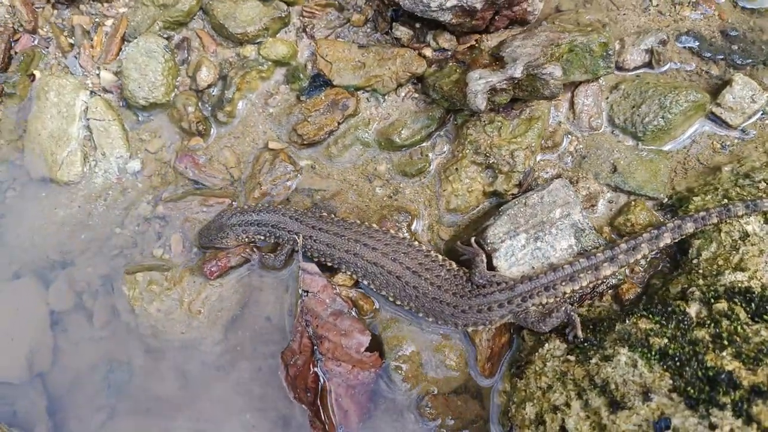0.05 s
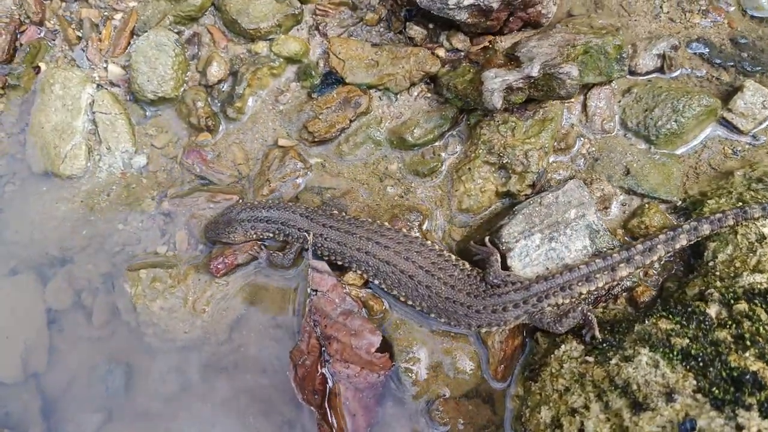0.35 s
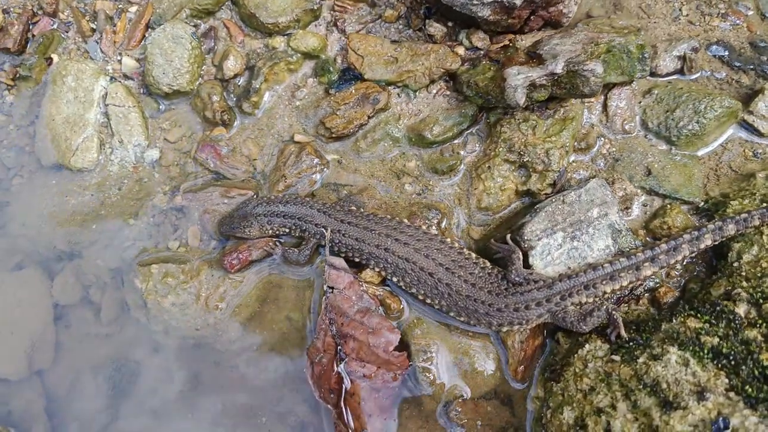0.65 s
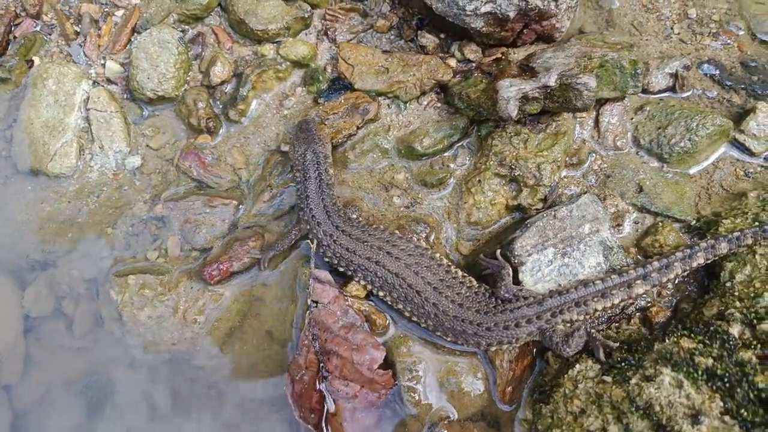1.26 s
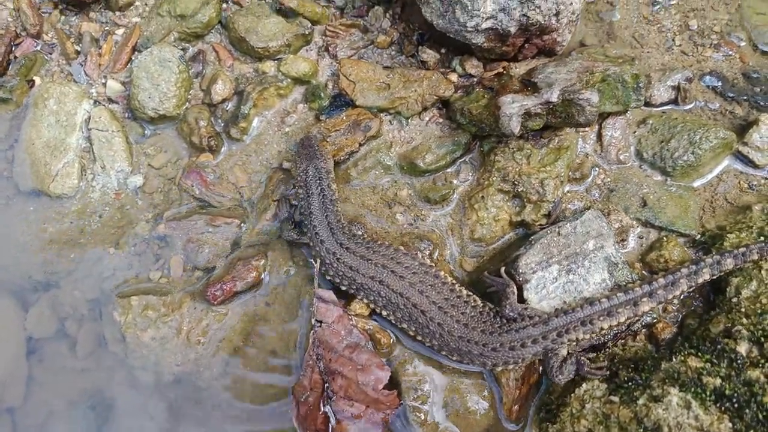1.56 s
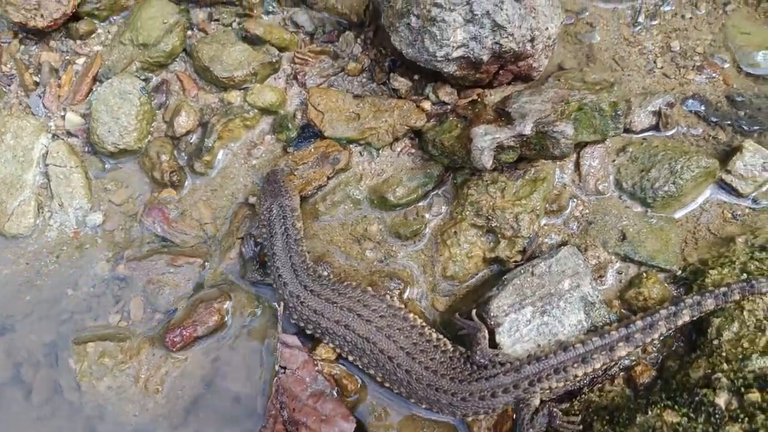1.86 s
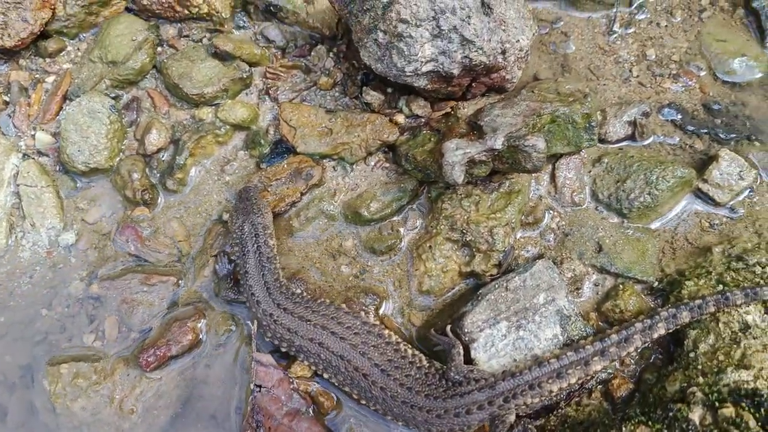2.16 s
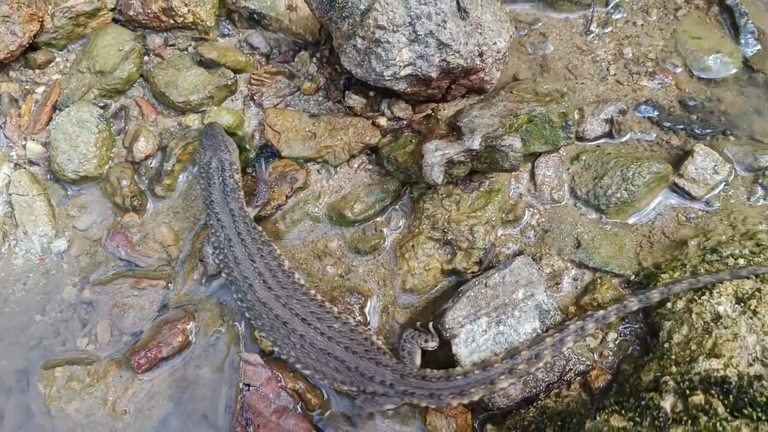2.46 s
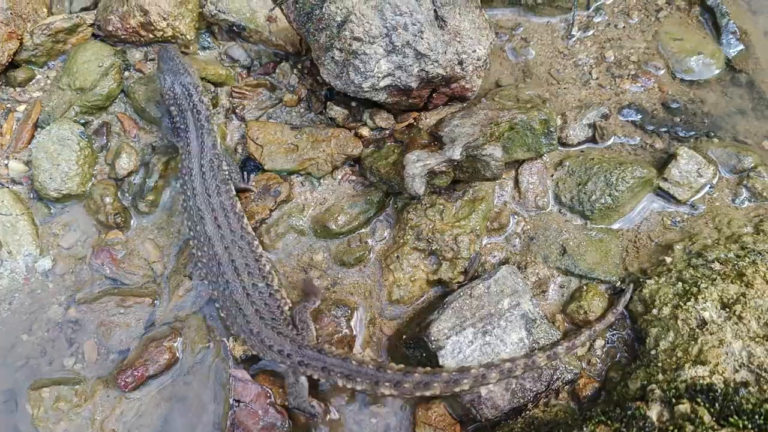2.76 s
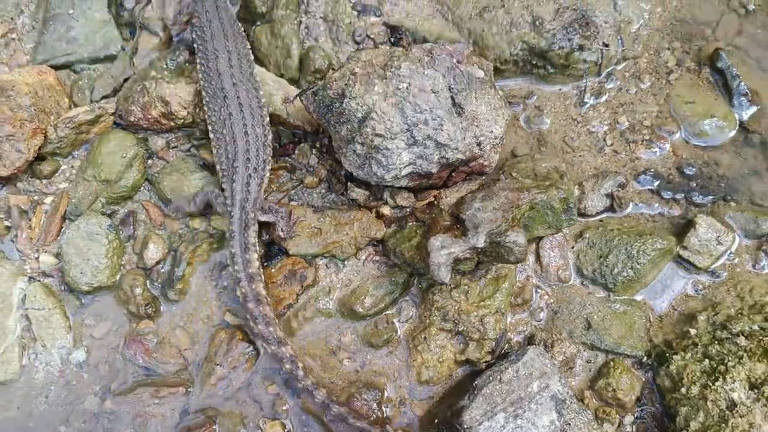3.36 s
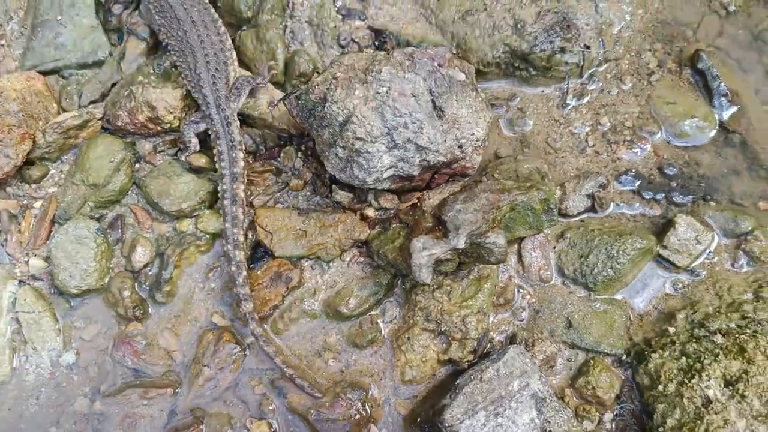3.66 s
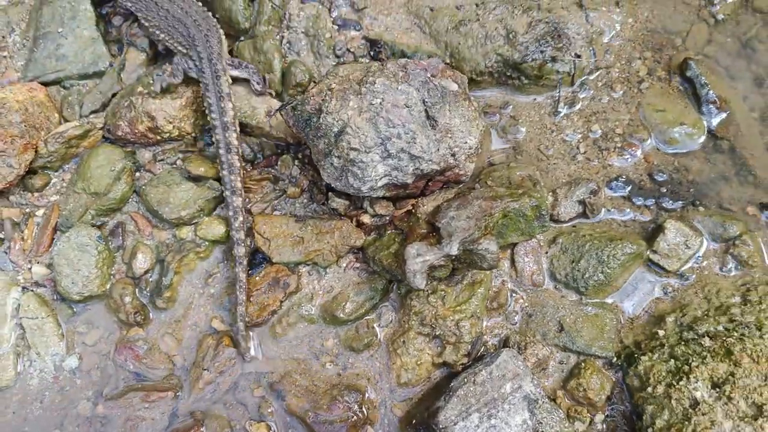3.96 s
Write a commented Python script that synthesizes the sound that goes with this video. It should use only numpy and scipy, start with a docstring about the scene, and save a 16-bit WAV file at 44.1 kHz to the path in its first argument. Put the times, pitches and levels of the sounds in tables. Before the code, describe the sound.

A cicada rattles loudly and continuously while a small bird chirps in the jungle.

```python
"""Jungle stream bank

A near cicada rattles 23 times a second, each beat a few falling chirps from its buckling tymbals
(drum skins). Behind it a cricket throbs and far insects blur into whistles. A small bird sings
falling and rising sweeps in turn, and soft calls come from deep in the forest. The stream murmurs
while a lizard steps faintly on the wet stones and drags its tail over gravel."""
import sys
import numpy as np
from scipy import signal
from scipy.fft import rfft, irfft
from scipy.io import wavfile
from scipy.ndimage import uniform_filter1d

SR = 44100
rng = np.random.default_rng(int(sys.argv[2]) if len(sys.argv) > 2 else 0)


def master_out(mix):
    """Clip the mix to full scale and print it as 16-bit PCM to the path in sys.argv[1]."""
    frames = np.transpose(np.atleast_2d(mix))
    ceiling = np.clip(frames, -1, 1)
    pcm = np.round(ceiling * 32767).astype(np.int16)
    wavfile.write(sys.argv[1], SR, pcm)


N = 176400

# When each chirp starts within a beat (time [s])
CHIRP_STARTS = [.0026, .0120, .0150, .0222, .0250]
# Those chirps (length [s], first pitch [Hz], last pitch [Hz], level [dB], octave level [dB],
# share of the swell [0-1])
CHIRPS = [(0.0061, 7650, 7120, -6.5, -3.5, 0.05), (0.0051, 8100, 7320, -6.5, -8, 0.1),
          (0.00577, 7950, 7117, 0, 1.5, 0.08), (0.0048, 8207, 8140, -5.5, 2, 0.51),
          (.0068, 8000, 7246, -0.5, -0.5, 0.02)]
# How far the cicada falls behind an even beat (time [s], lag [s])
CICADA_LAG = [(0, 0), (.3, .0003), (.65, .004), (.95, .0075), (1.3, .0093), (1.8, .0092), (2.05, .0104),
              (2.3, .0095), (2.55, .0108), (2.9, .0092), (3.3, .0088), (4, .0072)]
# How hard it sings (time [s], boost [dB], octave boost [dB])
CICADA_EFFORT = [(0, 0.5, -13), (.35, 0.5, -11), (.75, -0.5, -13.5), (1.1, -1, -10.5), (1.8, 0, -15),
                 (2.12, 1.5, -8.5), (2.55, 0.5, -11), (2.8, 0, -13), (3.2, 0, -9.5), (3.65, -0.5, -14),
                 (4, -2, -12)]
# A swell that mostly affects the highest chirp (time [s], boost [dB])
CICADA_SWELL = [(0, -2), (.3, -7), (.39, 7), (.5, -5), (.59, 5), (.63, 9), (.68, 11), (.8, 1), (.92, 7),
                (1.02, -3.5), (1.9, -6), (2.75, 1.5), (3.02, 4.5), (3.2, 1), (3.42, 4.5), (3.47, 8),
                (3.56, 7), (3.62, -15), (3.68, 11.5), (3.735, 10), (3.8, -7), (3.86, 13), (4, 18)]
# The cicada's tone colour at each side (frequency [Hz], left boost [dB], right boost [dB])
CICADA_COLOUR = [(6370, -11, -1.5), (6630, -23.5, -0.5), (7646, -10.5, -2.5), (7495, -2, -17),
                 (7784, 1.5, -29.5), (10150, 18, -33), (10760, -31, -41), (13600, -17.5, 4.5),
                 (14700, -11, -10), (15740, -5.5, 3.5)]
def cicada():
    """Each buckling of the tymbals rings a short falling tone with its octave."""
    beat_s, jitter_s, pitch_spread = .043, .00042, .01
    out = np.zeros(N)
    rasp = 1 + .08 * noise_band(0, 1760)[0]
    for beat in np.arange(-.0415, N / SR, beat_s):
        for offset, (length, first_hz, last_hz, db, octave_db, share) in zip(CHIRP_STARTS, CHIRPS):
            late, sharp, loud, swell, phase = rng.standard_normal(5)  # no two chirps are alike
            start = beat + read(CICADA_LAG, beat) + offset + jitter_s * late
            progress = np.arange(0, length, 1 / SR) / length
            hz = (first_hz + (last_hz - first_hz) * progress) * (1 + pitch_spread * sharp)
            angle = 2 * np.pi * (np.cumsum(hz) / SR + phase)
            octave = amp(octave_db + read(CICADA_EFFORT, start, column=2)) * np.sin(2 * angle)
            swell_db = share * (read(CICADA_SWELL, start) + 1.2 * swell)
            level = amp(db + read(CICADA_EFFORT, start) - .1 * loud + swell_db)
            fade = abs(np.sin(np.pi * progress)) ** 1.3
            add(out, start, level * fade * (np.sin(angle) + octave))
    out *= rasp
    direct = np.array([np.roll(out, round(.00018 * SR)), out])  # reaches the left a little later
    scattered = echoes(out, fade_s=.1) * amp([[-10], [-9]])
    return amp(-31.5) * colour(direct + scattered, CICADA_COLOUR)


# One cricket chirp (progress [0-1], pitch shift [Hz], level [dB])
CRICKET_CHIRP = [(0, 0, -20), (.12, 4, 0), (.6, 2, -1), (.8, -32, -12), (.92, -170, -14), (1, -200, -20)]
# How loud the cricket is on the left (time [s], level [dB])
CRICKET_LEVEL = [(0, -55), (.27, -53), (.7, -56.5), (1.1, -57.5), (1.5, -57.5), (1.75, -61.5), (1.95, -54),
                 (2.15, -61), (2.4, -57), (2.9, -61.5), (3.4, -55), (3.9, -56)]
def cricket():
    """A cricket repeats a pure chirp that sags as it fades; the forest blurs it into a throb."""
    pitch_hz, chirps_per_s, right_db = 5486, 10.7, -6.5
    t = np.arange(N) / SR
    progress = np.arange(0, 1, chirps_per_s / SR)
    sag = np.resize(np.cumsum(read(CRICKET_CHIRP, progress)), N)  # resize repeats the chirp
    throb = np.resize(amp(read(CRICKET_CHIRP, progress, column=2)), N)
    hz = pitch_hz + 1.2 * noise_band(0, 6)[0]  # the pitch wanders slightly
    tone = throb * np.sin(2 * np.pi * (np.cumsum(hz) + sag) / SR)
    sides = np.array([unit(side) for side in tone + echoes(tone, fade_s=.9)])
    return sides * amp(read(CRICKET_LEVEL, t)) * amp([[0], [right_db]])


# The bird's falling and rising sweeps (start [s], length [s], level [dB], tip boost [dB])
FALLS = [(.484, 0.095, -52, -11), (1.320, .1, -50, -2), (2.280, .088, -53.5, 11), (3.279, 0.063, -48.5, 1)]
RISES = [(.900, 0.11, -48.5, 3), (1.832, 0.095, -48, -6), (2.802, 0.098, -47.5, -5),
         (3.767, 0.094, -49.5, 7)]
# The shape of each kind (progress [0-1], pitch [Hz], boost [dB])
FALL_SHAPE = [(0, 4650, -11), (0.249, 5360, -11), (0.461, 4815, 0.5), (0.679, 4143, -2), (.8, 4010, -11),
              (1.001, 3280, -17)]
RISE_SHAPE = [(0, 3850, -21), (.11, 4120, -5), (.33, 4550, -3.5), (.5, 5040, 0), (.57, 5700, -20),
              (.68, 5890, -10.5), (1, 5660, -18)]
def bird():
    """A bird on the left sings fluttering sweeps with hoarse tips that ring on among the trees."""
    flutter_db, right_db = 3, -11.5
    out = np.zeros(N)
    waver, flutter = noise_band(0, 500)
    for calls, shape in ((FALLS, FALL_SHAPE), (RISES, RISE_SHAPE)):
        for start, length, db, tip_db in calls:
            progress = np.arange(0, length, 1 / SR) / length
            tip = np.interp(progress, (.68, .8), [0, 1])  # the end of the sweep turns hoarse
            wobble = (.014 + .025 * tip) * np.roll(waver, -round(start * SR))[:len(progress)]
            hz = read(shape, progress) * (1 + .006 * rng.standard_normal() + wobble)
            level = amp(db + tip_db * tip + read(shape, progress, column=2))
            fade = signal.windows.tukey(len(progress), .15)
            add(out, start, level * fade * np.sin(2 * np.pi * np.cumsum(hz) / SR))
    out *= amp(flutter_db * flutter)
    scattered = amp(-6) * echoes(out, fade_s=.1)
    forest = amp(-1) * echoes(out, fade_s=.9)
    return (out + scattered + forest) * amp([[0], [right_db]])


# Choirs of far insects (pitch [Hz], width [Hz], left level [dB], right level [dB])
CHOIRS = [(2448, 132, -87.5, -73.5), (3025, 170, -66.5, -69.5), (3088.4, 94, -54, -55.5),
          (5460, 190, -67, -62), (15000, 1200, -77.5, -71), (8230, 540, -49, -72.5),
          (7100, 510, -60.5, -59.5), (9230, 690, -67.5, -110)]
def far_insects():
    """Many far insects on shared pitches blur into wavering whistles."""
    return sum(noise_band(hz, width) * amp([[left], [right]]) for hz, width, left, right in CHOIRS)


# The tone colour of stream and forest (frequency [Hz], left boost [dB], right boost [dB])
STREAM_COLOUR = [(21.2, -96.5, -104), (64, -94.5, -91), (104.4, -84.5, -85), (175.4, -88.5, -89),
                 (317, -99, -99), (610, -103, -103), (1080, -109, -106), (2450, -115, -105),
                 (2860, -112, -109), (3390, -109, -109), (3780, -101, -106), (4560, -95.5, -100),
                 (5400, -107, -104), (10040, -108, -130), (11560, -128, -135), (16100, -106, -104)]
# How alike the two sides sound (frequency [Hz], likeness [0-1])
STREAM_LIKENESS = [(60, 0.74), (500, 0.03), (1500, 0)]
def stream():
    """The stream murmurs low under a faint forest hiss, both in drifting patches."""
    hz, _, (left, other) = signal.stft(rng.standard_normal((2, N)), SR, nperseg=1024)
    likeness = read(STREAM_LIKENESS, hz)[:, None]
    right = likeness * left + np.sqrt(1 - likeness ** 2) * other
    patches = uniform_filter1d(rng.standard_normal(left.shape), size=4, axis=0)  # smooth over pitch
    patches_db = 1.25 * unit(uniform_filter1d(patches, size=8, axis=1))  # and over time
    _, noise = signal.istft(np.array([left, right]) * amp(patches_db), nperseg=1024)
    return amp(41.5) * colour(noise[:, :N], STREAM_COLOUR)


# Wet footfalls (time [s], level [dB], pitch [Hz])
STEPS = [(3.117, -68, 905), (3.478, -58.5, 816), (3.508, -63, 790), (3.855, -62, 830)]
# Ticks of grit (time [s], level [dB])
GRIT_TICKS = [(2.433, -54), (2.48, -53), (3.510, -54)]
def lizard_steps():
    """Feet pat the wet mud and flick grit against stone."""
    rise_s, pat_decay_s, tick_decay_s = .006, .015, .009
    out = np.zeros((2, N))
    t = np.arange(SR // 8) / SR
    for start, db, hz in STEPS:
        pat = noise_band(hz, width_hz=520)[0, :len(t)]
        add(out, start, amp(db) * pat * np.minimum(t / rise_s, 1) * np.exp(-t / pat_decay_s))
    for start, db in GRIT_TICKS:
        tick = noise_band(4600, width_hz=6500)[:, :len(t)]
        add(out, start, amp(db) * tick * np.exp(-t / tick_decay_s))
    return out


# How loud the dragging tail is (time [s], level [dB])
TAIL_LEVEL = [(3.2, -131), (3.45, -92), (3.7, -65), (3.9, -91), (4, -88)]
def lizard_tail():
    """The tail drags over wet gravel with a faint, grainy rustle."""
    grains = unit(amp(6 * noise_band(0, 300)[0]))
    hiss = noise_band(12300, width_hz=21000)
    return hiss * grains * amp(read(TAIL_LEVEL, np.arange(N) / SR))


# Calls from deep in the forest (start [s], length [s], pitch [Hz], width [Hz], level [dB])
FAR_CALLS = [(2.35, 0.045, 2100, 88, -66.5), (2.36, 0.28, 3700, 740, -70), (0.0084, 0.67, 628, 38, -76.5),
             (3.1, 0.12, 475, 60, -76.5), (3.3, 0.21, 570, 59, -75), (3.45, 0.57, 642, 50, -75)]
def far_calls():
    """Distance smears each call into a soft swell of noise."""
    t = np.arange(N) / SR
    out = np.zeros((2, N))
    for start, length, hz, width, db in FAR_CALLS:
        progress = np.clip((t - start) / length, 0, 1)
        out += amp(db) * noise_band(hz, width) * np.sin(np.pi * progress)
    return out


def echoes(sound, fade_s):
    """Stones and trunks send different echoes to each side, dying by 60 dB in fade_s."""
    t = np.arange(SR) / SR
    tail = rng.standard_normal((2, SR)) * (rng.random((2, SR)) < 2000 / SR)  # about 2000 a second
    tail *= amp(-60 * t / fade_s) * (t > .002)
    tail /= np.linalg.norm(tail, axis=1, keepdims=True)
    return signal.fftconvolve(sound[None], tail, axes=1)[:, :N]


def noise_band(hz, width_hz):
    """Stereo noise around one pitch; around 0 Hz it is a random wobble."""
    distance_hz = abs(np.fft.rfftfreq(N, 1 / SR) - hz)
    spectrum = rfft(rng.standard_normal((2, N)))
    return unit(irfft(spectrum / (1 + (2 * distance_hz / width_hz) ** 3), N))


def colour(sound, table):
    """Turns each frequency up or down, separately for left and right."""
    hz = np.fft.rfftfreq(N, 1 / SR)
    return irfft(rfft(sound) * amp([read(table, hz), read(table, hz, column=2)]), N)


def amp(db):
    """Turns decibels into a multiplier."""
    return 10 ** (np.asarray(db) / 20)


def unit(x):
    """Scales a signal to an average strength (rms) of 1."""
    return x / np.sqrt(np.mean(x ** 2) + 1e-20)


def read(table, at, column=1):
    """Looks up a value, joining the table's rows with straight lines."""
    columns = np.transpose(table)
    return np.interp(at, columns[0], columns[column])


def add(mix, start_s, sound):
    """Mixes a sound in at a time, dropping what falls outside the mix."""
    start = round(start_s * SR)
    sound = sound[..., max(-start, 0):]
    part = mix[..., max(start, 0):][..., :sound.shape[-1]]
    part += sound[..., :part.shape[-1]]


def scene():
    """All the sounds of the stream bank together."""
    singers = cicada() + cricket() + far_insects() + bird() + far_calls()
    return singers + stream() + lizard_steps() + lizard_tail()


def record(dry):
    """Cuts away the very highest treble."""
    cutoff_hz = 15830
    low_pass = signal.firwin(801, cutoff_hz, window=("kaiser", 9), fs=SR)
    return signal.oaconvolve(dry, low_pass[None], "same")


dry = scene()
out = record(dry)
master_out(out)
```